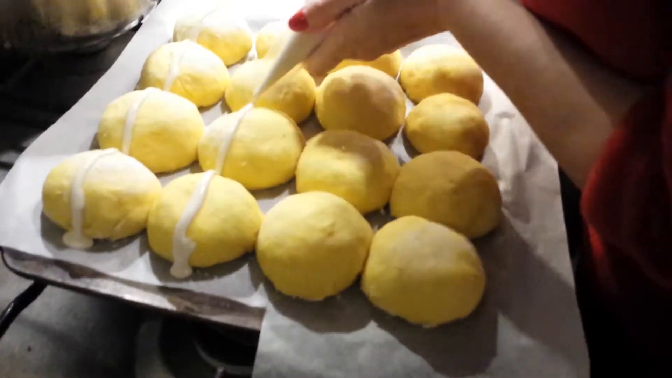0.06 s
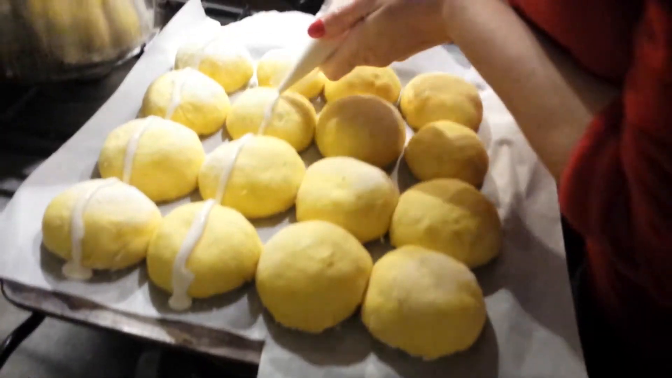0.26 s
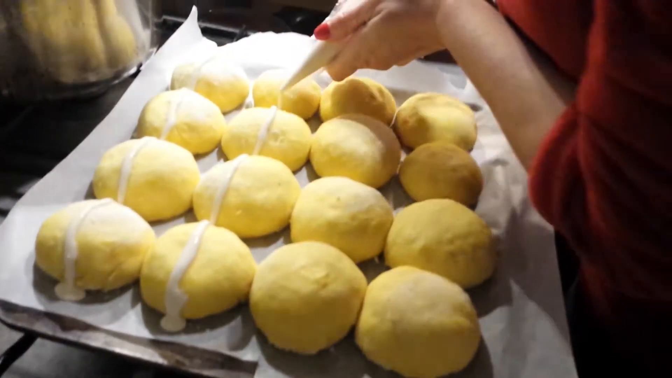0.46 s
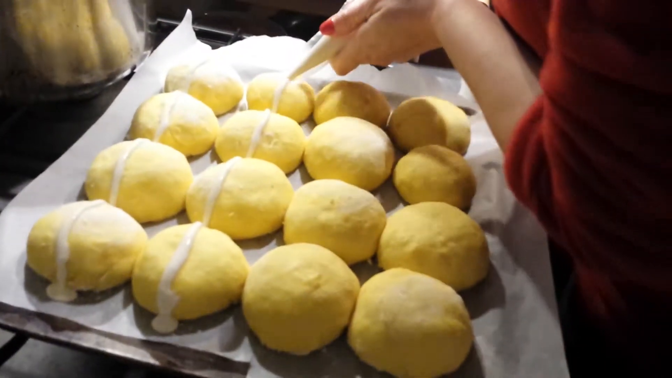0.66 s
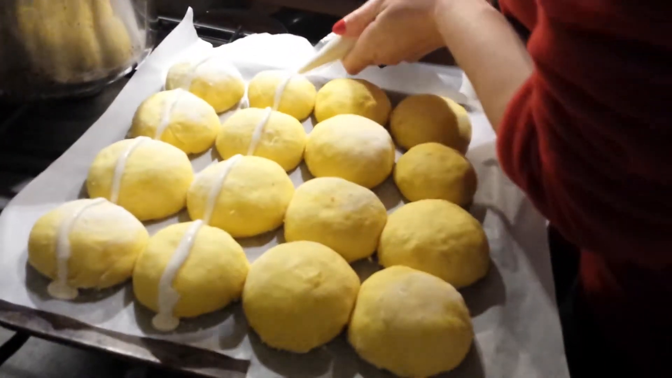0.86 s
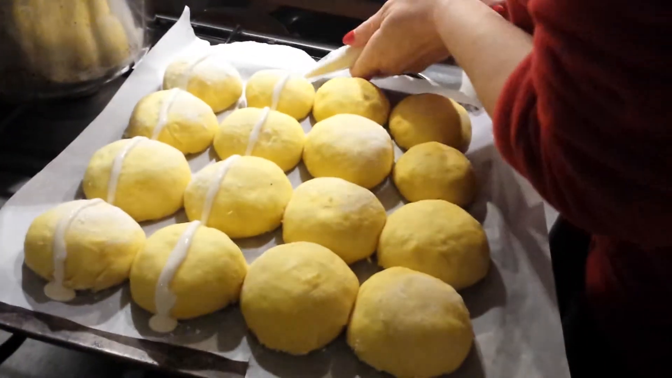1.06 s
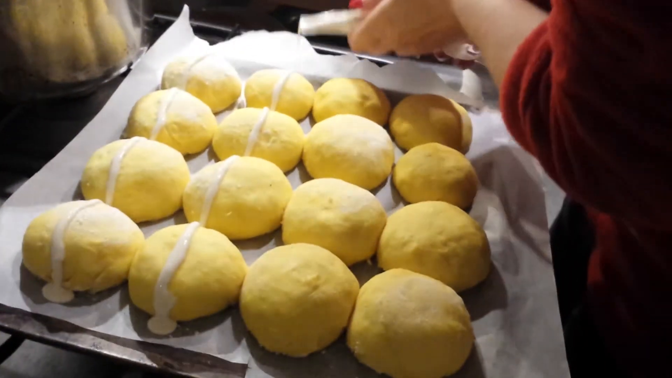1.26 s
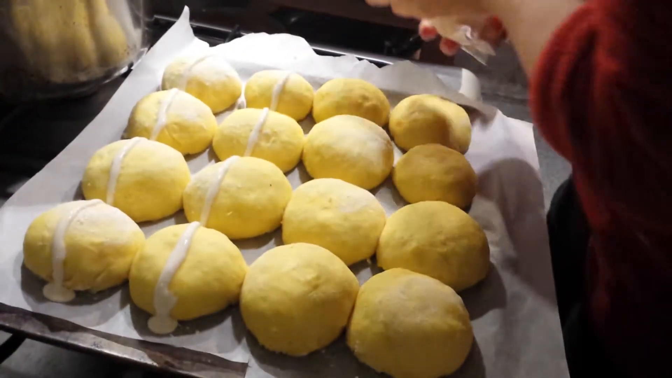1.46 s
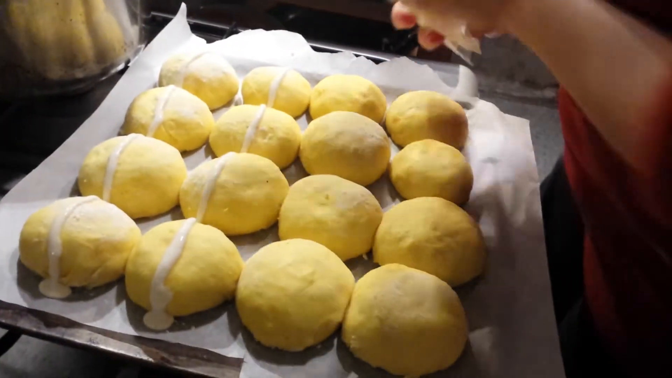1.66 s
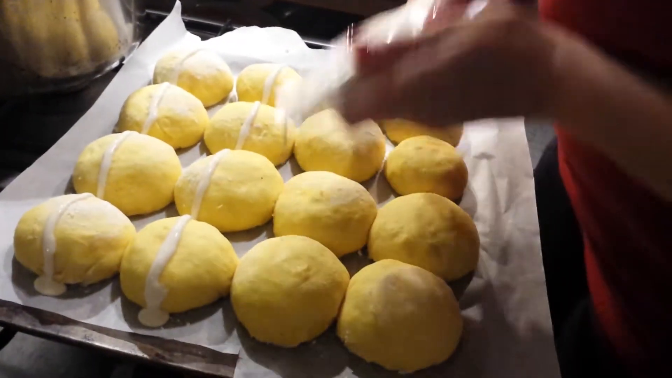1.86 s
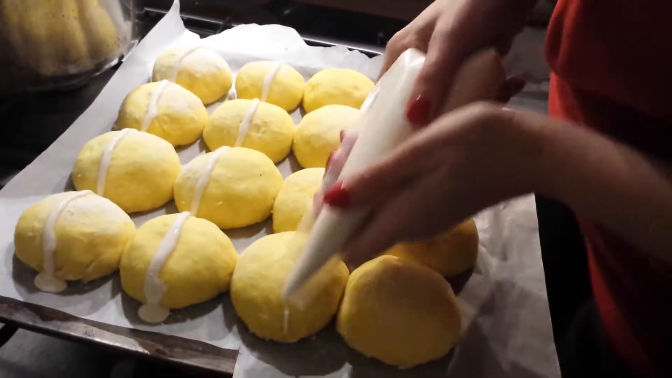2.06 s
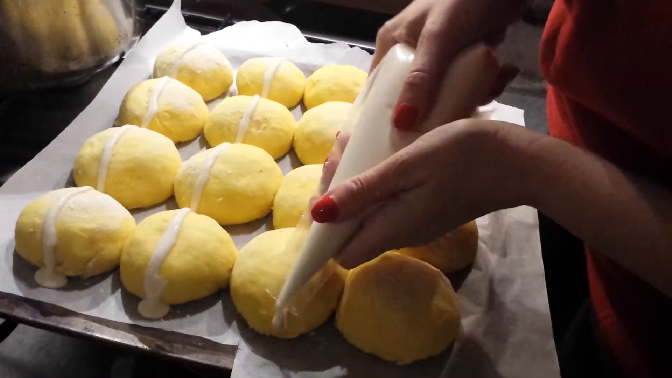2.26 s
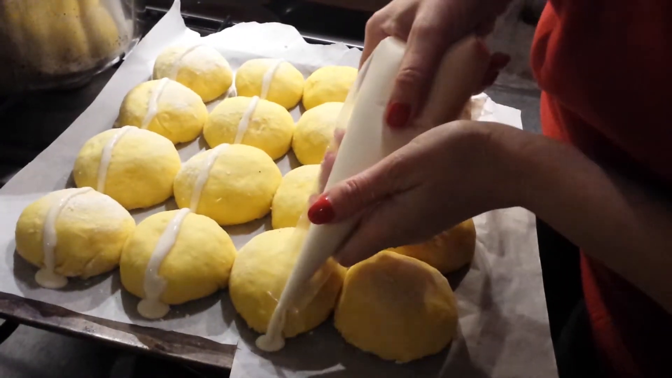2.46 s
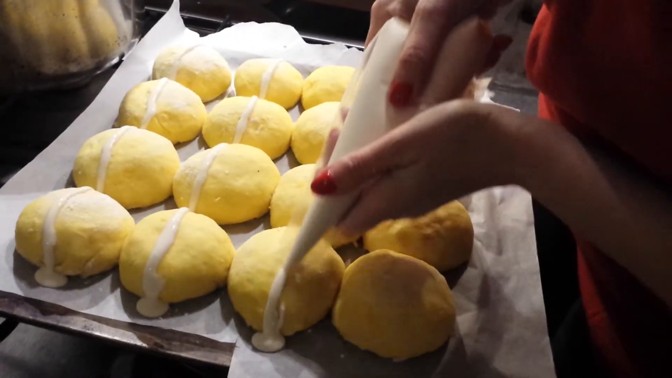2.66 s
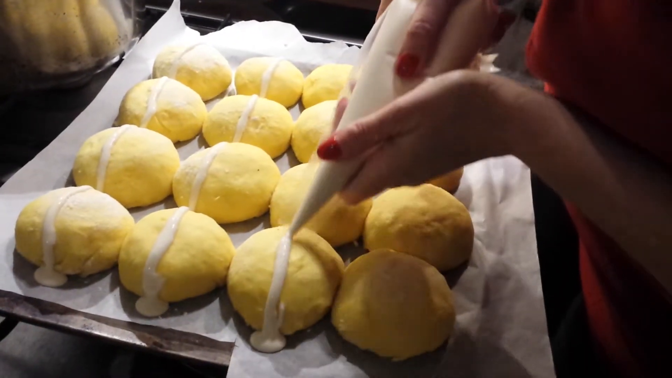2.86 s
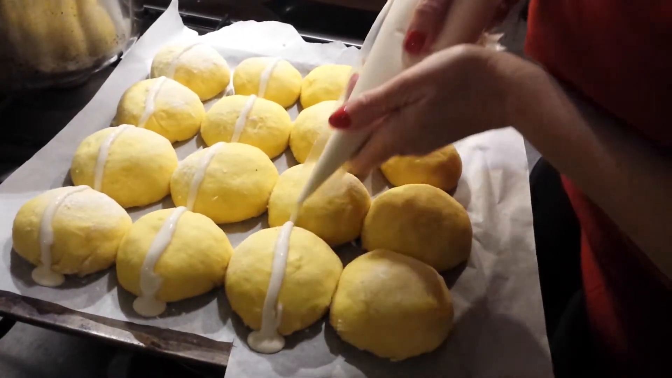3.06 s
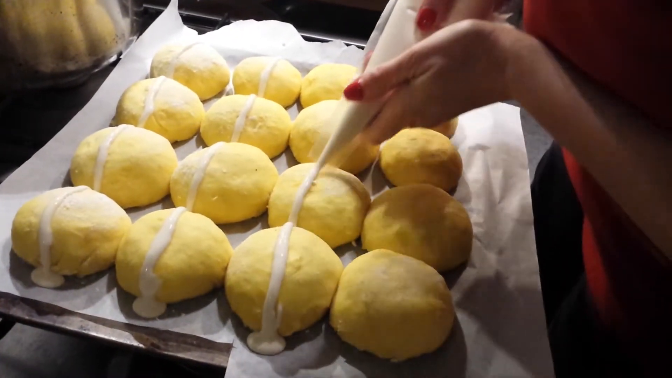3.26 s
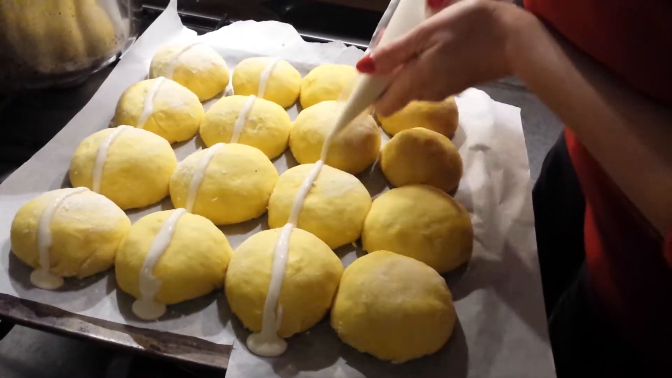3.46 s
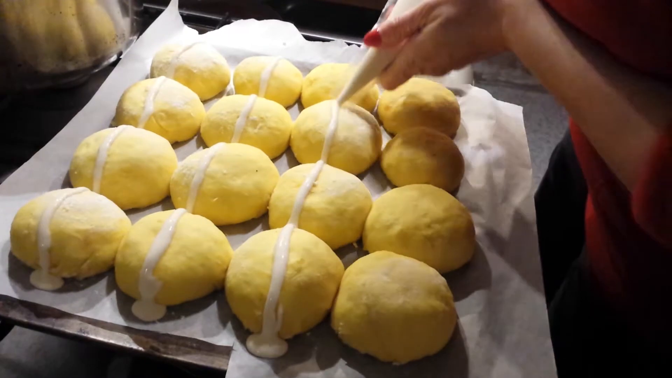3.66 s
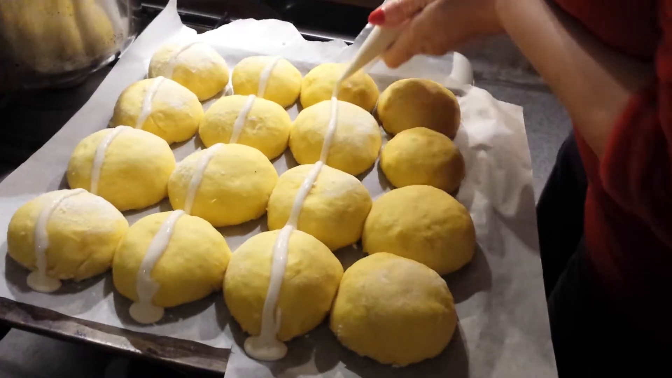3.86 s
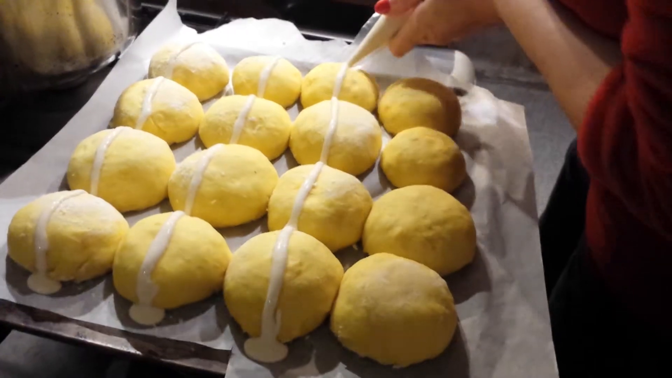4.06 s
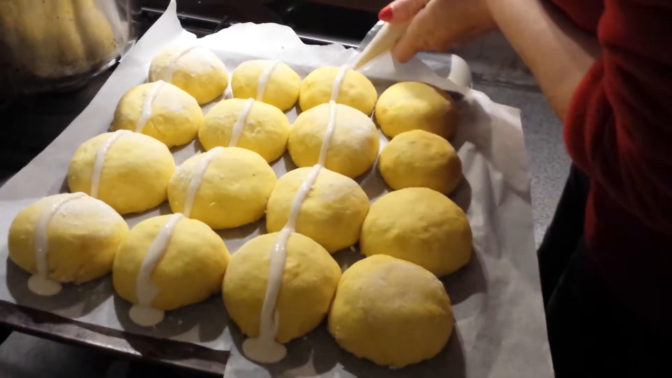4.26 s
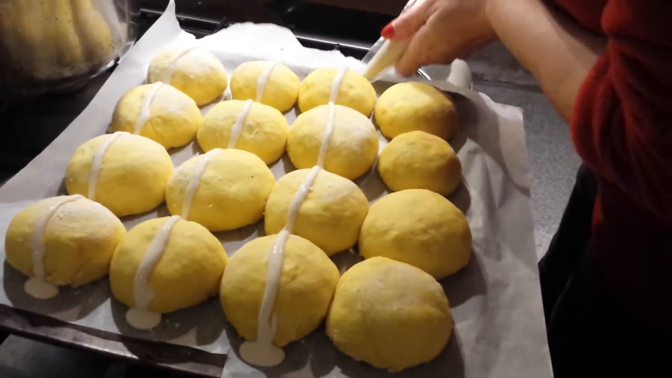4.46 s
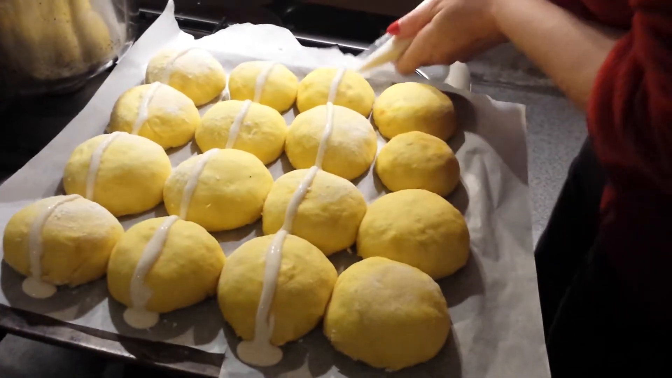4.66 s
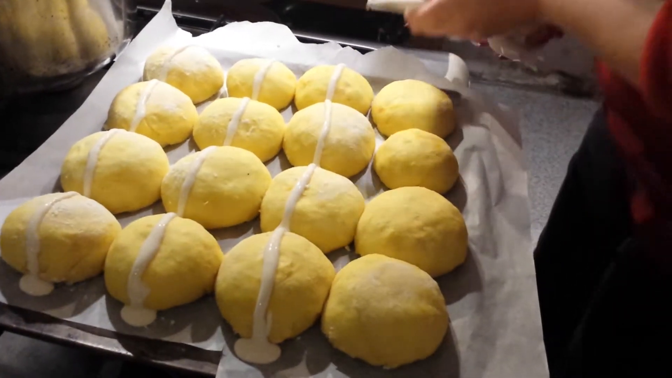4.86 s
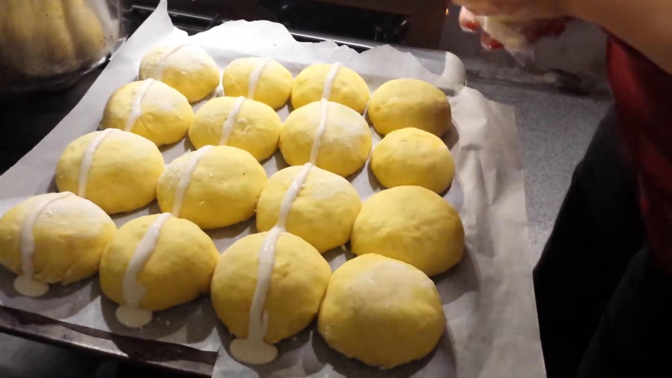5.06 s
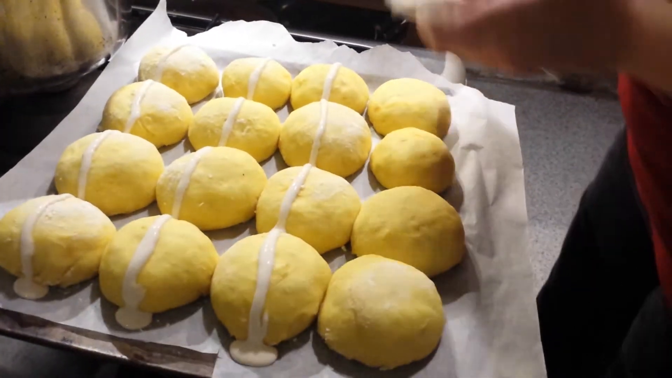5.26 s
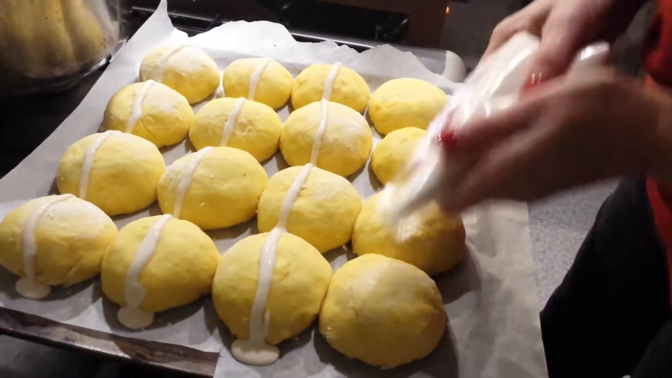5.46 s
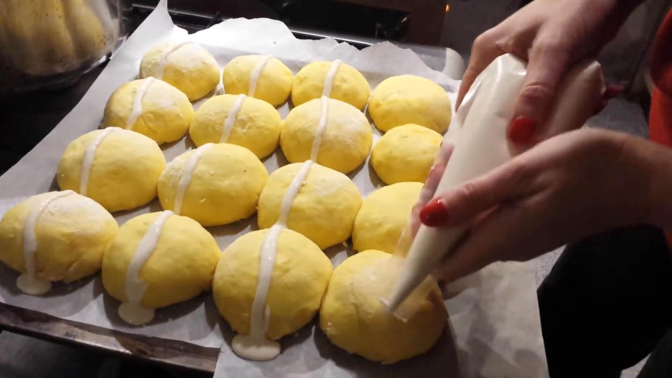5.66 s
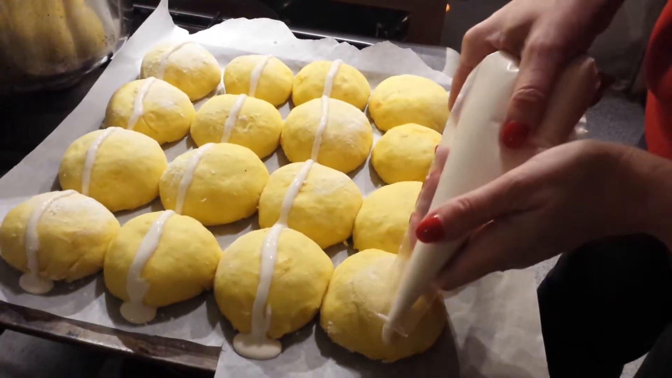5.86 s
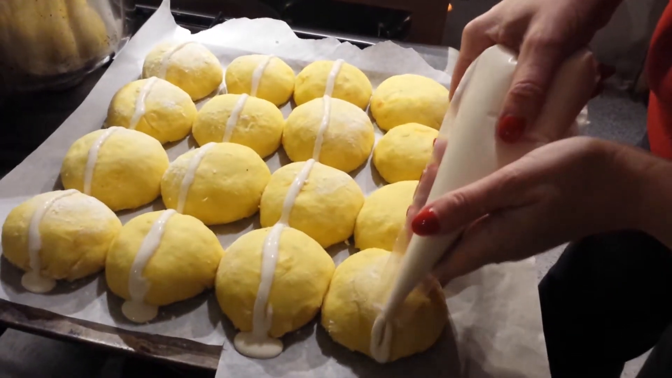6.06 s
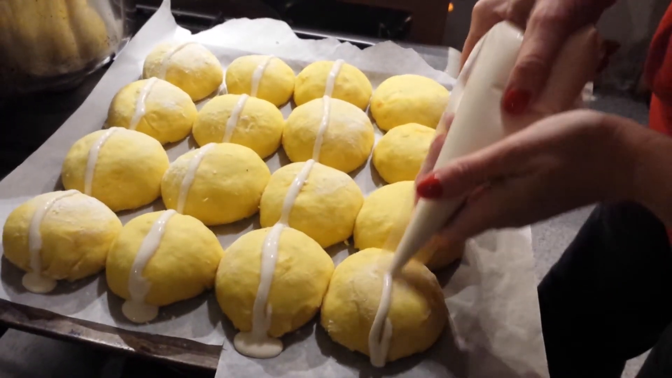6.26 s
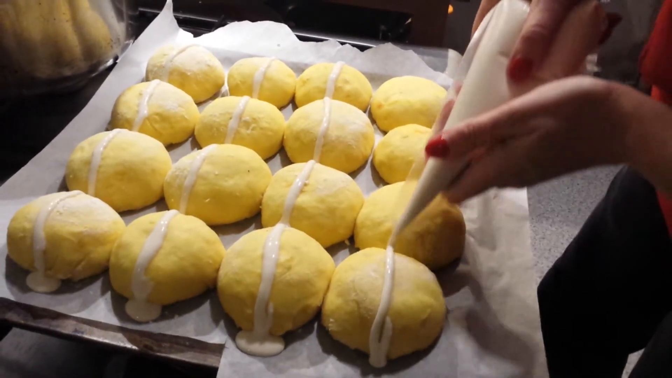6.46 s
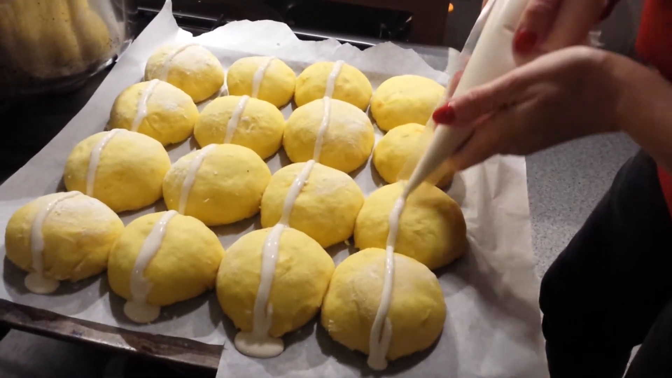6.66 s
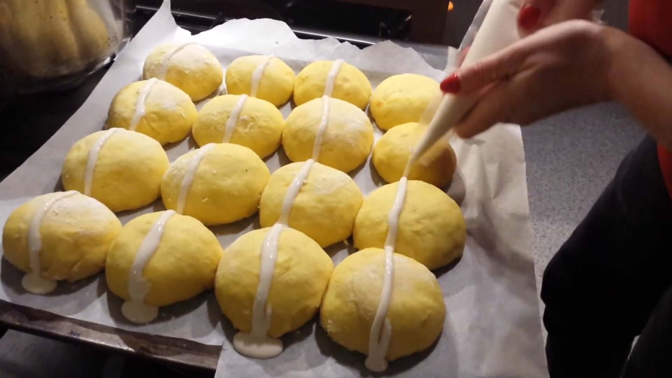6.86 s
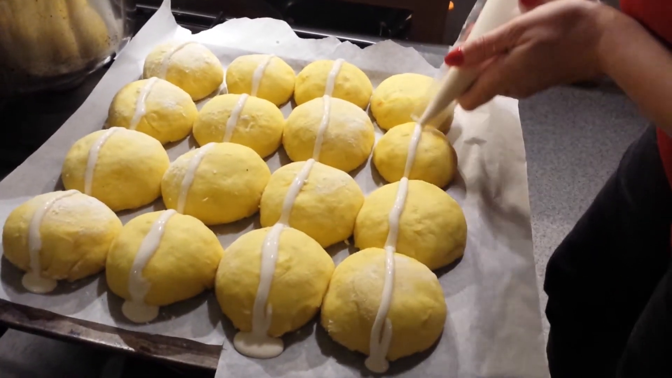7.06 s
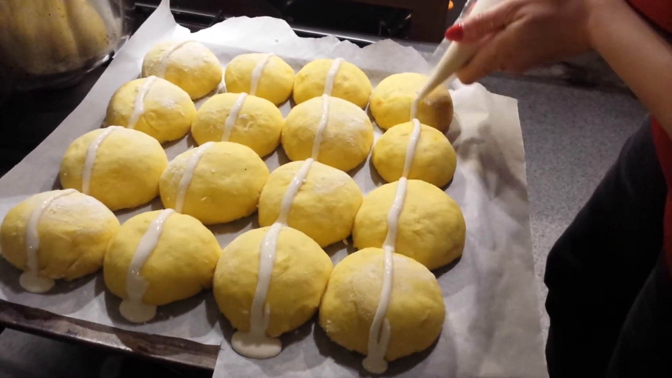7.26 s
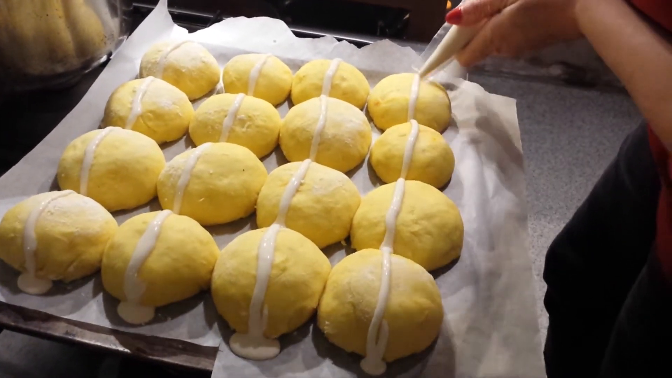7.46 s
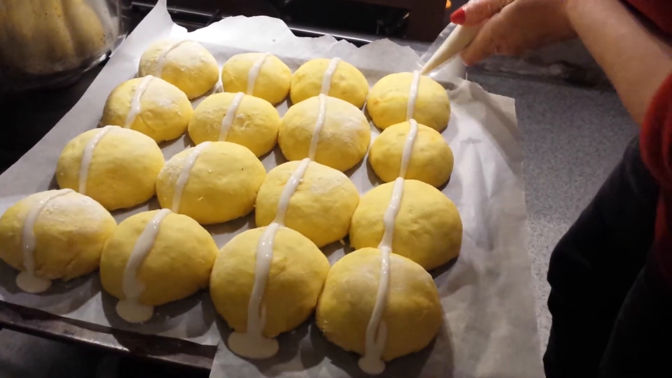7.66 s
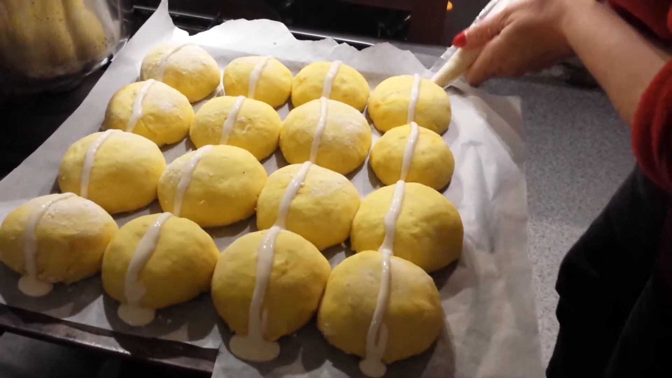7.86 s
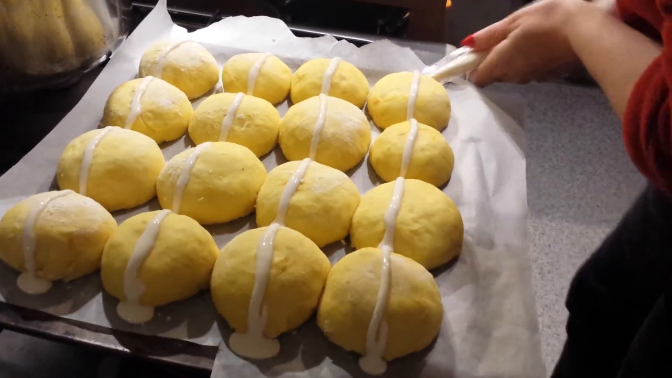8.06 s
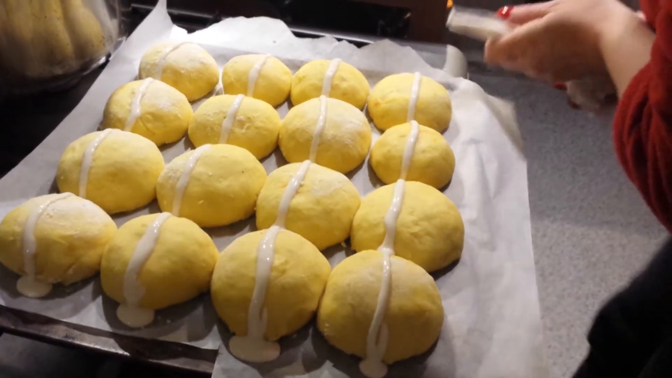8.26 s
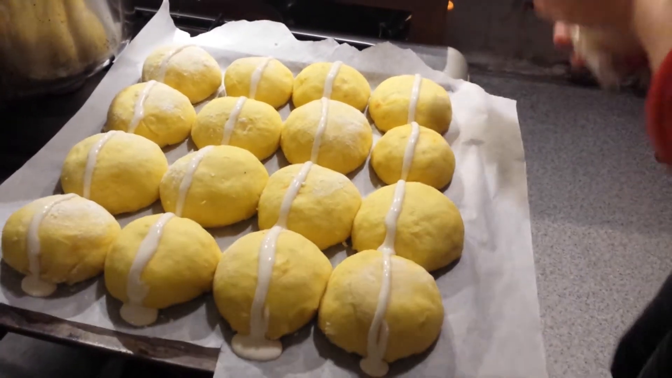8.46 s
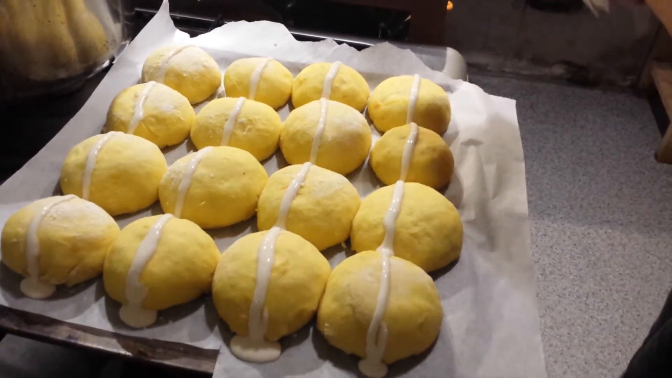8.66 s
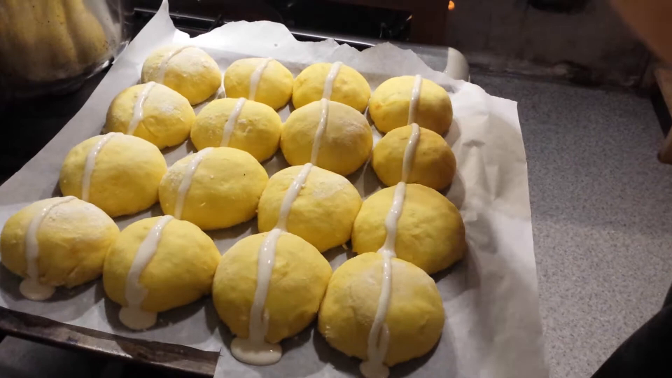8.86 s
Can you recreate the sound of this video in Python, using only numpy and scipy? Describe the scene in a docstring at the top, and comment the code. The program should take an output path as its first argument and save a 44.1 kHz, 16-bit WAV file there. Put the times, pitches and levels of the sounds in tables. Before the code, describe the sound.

Close to the microphone, a plastic piping bag rustles and snaps briefly, then icing squelches and spits faintly from the tip and the baking tray is softly bumped. A longer spell of crackling follows, with finger swishes and low thuds. After more quiet piping, a last sharp crinkle peaks with a soft thump. Underneath lies the faint hiss and electrical hum of a small, still kitchen.

```python
"""A plastic piping bag is squeezed over a tray of buns in a quiet kitchen, over a faint mains hum.
Icing squelches softly through the tip, and at 1 s the hands regrip: film slides, slack facets pop and
creases snap in small avalanches. Icing spits, low bumps shake the tray, and near 4.5 s comes a longer
regrip with dull thuds and finger swishes. More icing follows and a faint hollow noise swells; just after
8 s the last regrip peaks with a thud and a bump of the tray. The room rings briefly throughout."""
import sys
import numpy as np
from scipy import signal
from scipy.fft import rfft, irfft, next_fast_len
from scipy.io import wavfile
from scipy.ndimage import uniform_filter1d

SR = 44100
rng = np.random.default_rng(int(sys.argv[2]) if len(sys.argv) > 2 else 0)


def master_out(mix):
    """Clip the mix to full scale and print it as 16-bit PCM to the path in sys.argv[1]."""
    frames = np.transpose(np.atleast_2d(mix))
    ceiling = np.clip(frames, -1, 1)
    pcm = np.round(ceiling * 32767).astype(np.int16)
    wavfile.write(sys.argv[1], SR, pcm)


N = 392490
TIME = np.arange(N) / SR
FREQ = np.maximum(np.arange(N // 2 + 1) * SR / N, 1)

# Room tone of the still kitchen. Each row: frequency in Hz, level in dB.
AIR_SPECTRUM = [(15, -40), (25, -10), (66, -17.5), (96, 2.5), (126, -25.5), (198, -5.5), (274, -17),
                (305, -6), (368, -15.5), (399, -15), (848, -18.5), (1800, -19), (2060, -11), (2230, -18),
                (15500, -26)]
# Mains hum. Each row: frequency in Hz, level in dB.
HUM_PARTIALS = [(49.5, -82), (99, -82.5), (149, -81.5), (198, -95), (246, -92), (397, -88.5), (595, -90),
                (645, -87)]
# Fader curve of the late, hollow swell. Each row: time in seconds, level in dB.
SWELL_LEVELS = [(6.7, -100), (6.95, -77.5), (7.5, -75), (7.75, -86.5), (8.0, -60), (8.6, -75)]
# Resonances of that swell. Each row: centre in Hz, width in Hz, gain in dB.
SWELL_RESONANCES = [(296, 44, -5.5), (425, 110, -15)]
# Standing waves of the kitchen. Each row: frequency in Hz, seconds to fade by 60 dB, gain in dB.
ROOM_MODES = [(227, 0.11, 3), (330, 0.79, 5), (487, 0.15, 2), (710, 1, -18)]
# The heavy bag shifting its weight. Each row: start in seconds, level in dB, decay in seconds.
BAG_THUDS = [(4.79, -64, .12), (5.118, -63, 0.16), (8.232, -53, 0.073)]
# Tone of those thuds. Each row: frequency in Hz, gain in dB.
THUD_SPECTRUM = [(25, -19), (52, -5), (92, -1), (130, -11), (230, -11), (350, -6), (480, -9), (750, -30),
                 (2000, -58), (16000, -120)]
# Soft pushes against the tray. Each row: start in seconds, level in dB, length in seconds.
TRAY_PUSHES = [(3.2, -59.5, .05), (3.248, -62.5, .018), (3.288, -56.5, .016), (3.33, -70.5, .08),
               (5.116, -71, .03), (8.232, -54, .03)]
# Modes of the loaded tray. Each row: centre in Hz, width in Hz, gain in dB.
TRAY_MODES = [(226, 58, 0), (440, 60, -6), (672, 40, -18), (1300, 300, -9)]
# Icing forced through the tip. Each row: start in seconds, length in seconds, level in dB,
# resonance in Hz, relative hiss in dB.
ICING_SQUELCHES = [(0.323, 0.043, -71, 1640, -11), (0.67, 0.25, -74, 1990, -2),
                   (2.747, 0.14, -67.5, 2010, 0.5), (2.853, 0.096, -68, 2000, -5),
                   (3.512, 0.015, -66.5, 2100, -39), (3.59, 0.21, -68, 2180, 0.5),
                   (6.225, 0.21, -68, 2030, 2), (6.901, 0.036, -66.5, 1790, -9),
                   (7.115, 0.039, -65, 2220, 0.5)]
# Air bubbles bursting in bag and tip. Each row: start in seconds, level in dB, cavity pitch in Hz,
# ring in ms, relative wet smack in dB, relative click in dB.
AIR_BUBBLES = [(2.348, -59, 880, 2.4, -3, -16), (2.875, -55.5, 1450, 0.56, 14, -11),
               (2.981, -44, 950, 4.3, -1.5, -1.5), (3.5978, -48, 1870, 0.92, 3, -8.5),
               (5.366, -46, 2600, 1.2, -5, -5), (7.406, -55.5, 1390, 1.8, 3, -1)]
# Fingers sliding on taut film. Each row: start, rise and hold in seconds, level in dB,
# lower resonance and its width in Hz, relative upper resonance in dB.
FINGER_SWISHES = [(5.118, 0.0021, 0.037, -51, 2400, 1740, 2), (5.67, 0.018, .055, -61.5, 2540, 910, -1.5),
                  (8.59, .012, 0.089, -55, 2300, 800, -8.5)]
# Hand moves that slide film and sleeve. Each row: time of full speed, build-up and hold in seconds,
# level in dB, tilt in dB per octave, left minus right in dB.
HAND_MOVES = [(0.01, .02, .11, -68.5, -3.5, 3), (0.331, .015, .04, -68.5, -4.5, 0.5),
              (0.69, .015, .04, -71, -2, -1.5), (1.045, .06, .24, -55.5, -2.5, 1),
              (1.743, 0.037, .06, -71.5, -2, 4), (2.801, 0.027, .2, -74, -4.5, 4),
              (3.207, .006, .05, -62, -6.5, 2), (3.71, .06, .035, -65.5, -2.5, 1),
              (4.056, .02, .05, -67.5, -1.5, 1), (4.336, .13, 0.076, -65, -2.5, 0),
              (4.568, .06, .09, -48, -3, 0), (4.81, .05, .07, -54, -2.5, 1),
              (4.932, .02, .04, -61.5, -3, 6), (5.079, .06, .02, -65, -4.5, 8.5),
              (5.114, .002, 0.02, -63, -2, 6.5), (5.228, .04, .05, -62.5, -3.5, 4.5),
              (5.689, .015, .04, -63.5, -2, 3.5), (6.243, 0.031, .12, -70.5, 1, 0),
              (7.122, .03, .02, -72, -7, 7), (7.52, .1, 0.051, -68, -2, 1),
              (7.852, .004, 0.049, -50.5, 2.3, 0.5), (7.955, .02, .16, -53, -1, 1.5),
              (8.173, 0.04, 0.035, -45.5, -2, 0), (8.268, 0.04, .04, -43, -3, 1),
              (8.619, .012, .09, -55, -2.5, 3), (8.735, 0.017, .06, -55.5, -2.5, 4)]
# Tone of the plastic film. Each row: frequency in Hz, gain in dB.
FILM_SPECTRUM = [(30, -36), (60, -10), (130, -12.5), (300, -10), (580, -11), (910, -9), (1330, -9),
                 (1920, -1.5), (2710, -4), (3790, -3), (5320, -1.5), (7320, -3.5), (9890, -6), (13350, -10),
                 (16000, -14.5)]
# Creases snapping. Each row: start in seconds, level in dB, decay in ms, tilt in dB per octave,
# facet resonance in Hz.
CREASE_SNAPS = [(0.037, -53, 1.1, -11.5, 1490), (0.060, -43.5, 1.8, -8.5, 5450),
                (1.056, -43, 0.85, -32, 1360), (1.0615, -27.5, 6.8, -2.5, 1430),
                (1.0622, -19.5, 2.8, -1.5, 4700), (1.0865, -25, 6.4, -1.5, 1280),
                (1.100, -31.5, 4, -4, 4900), (1.117, -37.5, 3.6, -10, 1530), (1.2112, -32, 3.6, -3.5, 1510),
                (1.2295, -31, 11, -3.5, 700), (1.247, -36.5, 4.6, -6.5, 1050), (1.289, -42, 10, -16, 950),
                (1.319, -52, 2, 7, 5800), (1.510, -50.5, 4, -5.5, 1140), (2.427, -51, 3.2, 2, 1360),
                (4.328, -46, 2, -8, 5550), (4.428, -36.5, 7.2, -4, 6500), (4.449, -29.5, 12, -4.5, 1680),
                (4.4585, -19, 3.2, -2.5, 6550), (4.4755, -29.5, 1.5, -6, 4880),
                (4.5332, -19.5, 3.7, -1, 1990), (4.5422, -15, 2.8, 3, 4260), (4.5495, -20.5, 1.3, -1, 4480),
                (4.563, -31, 2.2, -4, 4500), (4.578, -26, 4.6, 1, 2074), (4.596, -22.5, 2.1, 0.5, 3700),
                (4.6128, -23, 2.7, 1, 1810), (4.6162, -14, 3.3, -2, 920), (4.6790, -28, 1.8, -2.5, 1930),
                (4.689, -31, 10, -3.5, 1390), (4.7052, -22, 3.2, -3.5, 1470), (4.7344, -25, 3.4, -4.5, 830),
                (4.7516, -21.5, 4.4, 1.5, 4100), (4.763, -32, 1.4, -7, 840), (4.7800, -25.5, 3.9, -1, 905),
                (4.786, -29.5, 3.4, -12, 1490), (4.7908, -16.5, 3, 0.5, 1720),
                (4.816, -29.5, 6.9, -14.5, 890), (4.844, -24.5, 5.4, -1.5, 1290),
                (4.854, -25.5, 4.3, -6, 5800), (4.891, -47, 1, -1, 5500), (5.030, -45, 3.9, 1, 2370),
                (5.078, -45.5, 1.7, 3, 2630), (5.241, -32.5, 0.8, -7, 5370), (5.258, -40.5, 1.6, 7, 760),
                (6.122, -47.5, 1, -3, 2240), (6.377, -44.5, 3.7, -1.5, 1980), (7.855, -40, 4.7, -1.5, 1170),
                (7.9115, -28, 1, -3, 3300), (7.953, -37, 7, -5, 1460), (8.001, -38.5, 1.7, -5, 1680),
                (8.021, -37.5, 5.3, -7, 2760), (8.040, -39, 4.8, -7, 1080), (8.107, -34, 1.6, 1, 1039),
                (8.1328, -31.5, 2.6, -2, 1950), (8.140, -26.5, 2.1, -1, 1100), (8.152, -28, 1.8, 2, 2000),
                (8.1595, -23, 1.7, -3, 1610), (8.1632, -26, 3.4, 1, 1620), (8.1855, -30, 4.5, -4.5, 1400),
                (8.1955, -37, 1.7, 3, 6000), (8.2283, -26, 2.8, -2, 1000), (8.2312, -11, 6.5, -0.9, 1300),
                (8.2548, -15, 9, -3.5, 6500), (8.2631, -16.5, 2.9, -1, 1000), (8.2835, -30, 1.6, -2, 1000),
                (8.291, -22.5, 3.3, 2, 6340), (8.297, -32.5, 3, -1, 5500), (8.340, -35, 5, 0, 2330),
                (8.683, -35.5, 9.9, -4.5, 4900), (8.745, -44, 2.8, -11, 1500), (8.763, -42, 1.6, -13, 2030),
                (8.800, -51, 1.3, -10, 2610), (8.833, -58, 1, -2, 6600)]
# How alike left and right sound. Each row: frequency in Hz, correlation from 0 to 1.
STEREO_LIKENESS = [(100, .82), (400, .91), (800, .83), (1500, .55), (3000, .25), (5000, .02), (15000, 0)]
# Stereo lean of the sounds from the hands. Each row: frequency in Hz, left minus right in dB.
HAND_BALANCE = [(300, .5), (1000, -.8), (2200, 2), (5000, 1.8), (8000, -3.5), (13000, -10)]
# Tone of the microphone ports. Each row: centre in Hz, width in Hz, gain in dB.
MIC_PORTS = [(2000, 420, -3), (3570, 2120, -3.5), (5670, 1260, 2.5)]


def undb(db):
    """Decibels to gain."""
    return 10 ** (np.asarray(db) / 20)


def unit(x):
    """Scale to rms 1."""
    return x / np.sqrt(np.mean(np.abs(x) ** 2) + 1e-30)


def along(table, freq):
    """Read (Hz, value) points on a log-frequency axis."""
    points, values = np.transpose(table)
    return np.interp(np.log(freq), np.log(points), values)


def colour(x, gain):
    """Filter by a gain for each frequency."""
    return irfft(rfft(x) * gain, N)


def passband(x, hz, width):
    """Keep one band, at rms 1."""
    edges = np.clip([hz - width / 2, hz + width / 2], 50, .45 * SR)
    return unit(signal.sosfilt(signal.butter(2, edges, "band", fs=SR, output="sos"), x))


def resonance(hz, width):
    """Response of one mode, gain 1 at its centre."""
    return 1 / (1 + 1j * (FREQ - hz ** 2 / FREQ) / width)


def causal(gain):
    """Minimum-phase response of a gain curve: it rings only after the hit."""
    cepstrum = irfft(np.log(gain))
    half = len(cepstrum) // 2
    cepstrum[1:half] *= 2
    cepstrum[half + 1:] = 0
    return np.exp(rfft(cepstrum))


def drift(rate_hz, hop=32):
    """Smooth random wander with a spread of 1."""
    steps = next_fast_len(N // hop + 2, True)
    freq = np.arange(steps // 2 + 1) * SR / (hop * steps)
    coarse = unit(irfft(rfft(rng.standard_normal(steps)) / (1 + (freq / rate_hz) ** 4), steps))
    return np.interp(np.arange(N) / hop, np.arange(steps), coarse)


def press(start, length):
    """Envelope of a push that comes quickly, holds and lets go."""
    return np.sqrt(np.abs(np.sin(np.pi * np.clip((TIME - start) / length, 0, 1))))


def pan(left_minus_right_db):
    """Left and right gains for a level difference."""
    return undb(left_minus_right_db * np.array([[.5], [-.5]]))


def mic_pair(x):
    """Mid and side to left and right: two close microphones share the bass and keep their own treble."""
    alike = np.clip(along(STEREO_LIKENESS, FREQ), 0, .99)
    mid = colour(x[0], np.sqrt((1 + alike) / 2))
    side = colour(x[1], np.sqrt((1 - alike) / 2))
    return np.array([mid + side, mid - side])


def room_tone(air_db=-68.5, sway_db=1.7, sway_below_hz=450):
    """Still kitchen air: a steady hiss over a rumble that sways a little."""
    air = mic_pair(unit(colour(rng.standard_normal((2, N)), undb(along(AIR_SPECTRUM, FREQ)))))
    rumble = colour(air, 1 / (1 + (FREQ / sway_below_hz) ** 4))
    return (air - rumble + rumble * undb(sway_db * drift(5.7))) * undb(air_db)


def mains_hum(waver_db=1.5):
    """A faint mains hum whose partials each waver in level and phase."""
    hum = 0
    for hz, db in HUM_PARTIALS:
        amplitude = np.sqrt(2) * undb(db + waver_db * drift(1.9))
        hum = hum + amplitude * np.sin(2 * np.pi * hz * TIME + 0.3 * drift(8.1))
    return hum


def hollow_swell(waver_db=3.5, top_hz=900):
    """Dull, hollow noise swells and wavers under the late rustling."""
    body = sum(undb(db) * resonance(hz, width) for hz, width, db in SWELL_RESONANCES)
    noise = unit(colour(rng.standard_normal(N), body / (1 + (FREQ / top_hz) ** 4)))
    return noise * undb(np.interp(TIME, *np.transpose(SWELL_LEVELS)) + waver_db * drift(16.0))


def kitchen_reverb(x, tail_db=-7.0, low_t60_s=0.22, treble_t60_s=0.13, split_hz=5000, build_s=0.001):
    """A short room tail whose treble dies first."""
    t = TIME[:SR // 2]
    noise = rng.standard_normal((2, len(t)))
    low = signal.sosfilt(signal.butter(2, split_hz, fs=SR, output="sos"), noise)
    high = signal.sosfilt(signal.butter(2, split_hz, "high", fs=SR, output="sos"), noise)
    tail = low * undb(-60 * t / low_t60_s) - high * undb(-60 * t / treble_t60_s)
    tail = undb(tail_db) * unit(tail * (1 - np.exp(-t / build_s))) / np.sqrt(len(t))
    return signal.fftconvolve(x, tail, axes=1)[:, :N]


def standing_waves(x):
    """A few low room modes linger after the bag has moved."""
    modes = sum(undb(db) * resonance(hz, np.log(1000) / (np.pi * t60)) for hz, t60, db in ROOM_MODES)
    return colour(x, modes)


def arm_rumble(level_db, rumble_db=-64.5, at_db=-55, follow=0.72, smooth_s=0.26, hz=92, width_hz=55):
    """Arms and body shift with each regrip: a soft low rumble that follows the hands slowly."""
    effort_db = uniform_filter1d(level_db, size=int(smooth_s * SR))
    low = resonance(hz, width_hz) / (1 + (FREQ / (3 * hz)) ** 4)
    rumble = mic_pair(unit(colour(rng.standard_normal((2, N)), low)))
    return rumble * undb(rumble_db + follow * (effort_db - at_db))


def bag_thuds(rise_s=0.0044):
    """The mass of icing lurches in the hands: a deep, pitchless thud, dead centre."""
    envelope = 0
    for start, db, decay in BAG_THUDS:
        t = TIME - start
        envelope = envelope + undb(db) * np.clip(t / rise_s, 0, 1) * np.exp(-np.abs(t) / decay)
    return unit(colour(rng.standard_normal(N), undb(along(THUD_SPECTRUM, FREQ)))) * envelope


def tray_bumps(slip_hz=113, uneven=.05, scuff_db=-10, contact_hz=560):
    """Soft, shuddering pushes ring the low modes of the tray, damped by the dough."""
    push = sum(undb(db) * press(start, length) for start, db, length in TRAY_PUSHES)
    cycles = np.cumsum(slip_hz * (1 + uneven * drift(60))) / SR
    slips = unit(np.diff(np.floor(cycles), prepend=0) * undb(drift(100)))  # one tick a cycle
    force = np.outer([1, 0], slips) + undb(scuff_db) * rng.standard_normal((2, N))
    body = sum(undb(db) * resonance(hz, width) for hz, width, db in TRAY_MODES)
    soft_contact = 1 / np.sqrt(1 + (FREQ / contact_hz) ** 6) + .08
    return colour(force * push, unit(body * soft_contact))


def squelches(width_hz=620, hiss_hz=7000, hiss_width_hz=7000, sticky_db=3):
    """Sticky icing crackles finely as it is forced through the narrow tip."""
    crackle = rng.standard_normal((2, N)) * undb(sticky_db * drift(560))
    hiss = unit(colour(crackle, resonance(hiss_hz, hiss_width_hz)))
    out = 0
    for start, length, db, hz, hiss_db in ICING_SQUELCHES:
        squelch = passband(crackle, hz, width_hz) + undb(hiss_db) * hiss
        out = out + squelch * undb(db) * press(start, length)
    return out


def bubbles(smack_hz=1950, smack_width_hz=750, click_hz=5500, click_width_hz=2600, burst_ms=1.9):
    """A trapped bubble bursts with a smack and a click, and its hollow rings for a moment."""
    size = 2048
    out = np.zeros((2, N + size))
    ms = 1000 * TIME[:size]
    for start, db, hz, ring_ms, smack_db, click_db in AIR_BUBBLES:
        hollow = unit(np.sin(2 * np.pi * hz * TIME[:size]) * np.exp(-ms / ring_ms))
        burst = rng.standard_normal((2, size)) * np.exp(-ms / burst_ms)
        smack = undb(smack_db) * passband(burst, smack_hz, smack_width_hz)
        click = undb(click_db) * passband(burst, click_hz, click_width_hz)
        at = int(start * SR)
        out[:, at:at + size] += (np.outer([1, 0], hollow) + smack + click) * undb(db) / np.sqrt(ms[-1])
    return out[:, :N]


def swishes(upper_hz=5700, upper_width_hz=1900, release_s=0.035, catch_db=3.5, flicker_db=0.9,
            sag_db=-3.5):
    """Skin catches and slips on taut film, which answers in two resonances that flicker separately."""
    slips = rng.standard_normal((2, N)) * undb(catch_db * drift(400))
    upper = unit(passband(slips, upper_hz, upper_width_hz) * undb(flicker_db * drift(30)))
    lower_slips = slips * undb(flicker_db * drift(30))
    out = 0
    for start, rise, hold, db, hz, width, upper_db in FINGER_SWISHES:
        t = TIME - start
        envelope = np.clip(t / rise, 0, 1) * np.exp(-np.clip(t - rise - hold, 0, 1) / release_s)
        envelope *= undb(db + sag_db * np.clip(t / hold, 0, 1))
        out = out + (passband(lower_slips, hz, width) + undb(upper_db) * upper) * envelope
    return out


def hand_motion(rest_db=-78, rest_tilt_db=-3, sag_db_per_s=9.5, release_s=.045,
                unfold_db=-22.5, unfold_s=0.22):
    """Level, tilt and pan curves of the sliding: moves build, sag and fade; the strongest sets the tone."""
    power = np.full(N, undb(rest_db) ** 2)  # the hands never quite rest
    tilt_sum, pan_sum = power * rest_tilt_db, 0
    for peak, build, hold, db, tilt_db, pan_db in HAND_MOVES:
        t = TIME - peak
        after = np.clip(t - hold, 0, 2)
        attack = np.exp(np.clip(t / build, -20, 0))
        unfolding = undb(unfold_db) * np.exp(-after / unfold_s)  # crumpled film goes on opening softly
        release = np.maximum(np.exp(-after / release_s), unfolding)
        move = (attack * release * undb(db - sag_db_per_s * np.clip(t, 0, hold))) ** 2
        power += move
        tilt_sum += move * tilt_db
        pan_sum += move * pan_db
    return 10 * np.log10(power), tilt_sum / power, pan_sum / power


def film_gain(freq, tilt_db):
    """The film's tone, brighter when it is taut."""
    octaves = np.log2(np.maximum(freq, 1100) / 3000)
    return undb(along(FILM_SPECTRUM, freq) + tilt_db * octaves)


def icing_damping(x, top_hz):
    """The icing inside damps the highest treble of the film."""
    return colour(x, 1 / np.sqrt(1 + (FREQ / top_hz) ** 4))


def rustle(level_db, tilt_db, grains_per_s=1100, grain_db=2.5, rub_db=-5, flicker_db=3.0):
    """Sliding film catches and slips: dense uneven grains over a smooth rub, flickering by octave."""
    sizes = undb(grain_db * np.minimum(rng.exponential(size=N), 5))
    slips = (rng.random(N) < grains_per_s / SR) * sizes
    grip = np.sqrt(np.abs(uniform_filter1d(slips ** 2, size=16)))
    grains = rng.standard_normal((2, N)) * (unit(grip) + undb(rub_db))
    spectrum = rfft(grains) * film_gain(FREQ, 0)
    out, power = 0, 0
    for octave in np.arange(-5, 4):
        window = np.cos(np.pi / 2 * np.clip(np.log2(FREQ / 3000) - octave, -1, 1)) ** 2
        band = irfft(spectrum * window, N)
        gain = undb(np.clip(tilt_db, -8, 4) * max(octave, -2))
        out = out + band * gain * undb(flicker_db * drift(28.0))
        power = power + np.mean(band ** 2) * gain ** 2
    return out / np.sqrt(power) * undb(level_db)


def small_pops(level_db, count=170, busy_db=-53, offset_db=-0.5, spread_db=5, decay_ms=2.6, tilt_db=-4,
               low_hz=950, high_hz=2800):
    """Extra crease rows: slack facets pop over at random, denser and harder the more the bag moves."""
    crumpled = np.cumsum(undb(np.minimum(level_db, busy_db)))
    when, force, pitch = rng.random((count, 3)).T
    at = np.searchsorted(crumpled, when * crumpled[-1])
    pop_db = level_db[at] + offset_db + spread_db * (2 * force - 1)
    facet_hz = low_hz * (high_hz / low_hz) ** pitch
    return [(start, db, decay_ms, tilt_db, hz) for start, db, hz in zip(TIME[at], pop_db, facet_hz)]


def creases(rows, rise_ms=0.19, ragged_db=4.0, echo_db=-16, echo_ms=11, thin_hz=1100,
            facet_octaves=0.36, max_ring_db=10, pitchless_db=-13, ring_loss_db_per_db=2.6):
    """Each crease gives way in a fading avalanche of tiny snaps that ring its own facet of film."""
    size = 4096
    out = np.zeros((2, N + size))
    ms = 1000 * TIME[:size]
    freq = np.maximum(np.arange(size // 2 + 1) * SR / size, 1)
    for start, db, decay_ms, tilt_db, facet_hz in rows:
        noise = rng.standard_normal((3, size))
        ragged = undb(ragged_db * unit(uniform_filter1d(noise[2], size=12)))
        fade = np.exp(-ms / decay_ms)
        avalanche = (1 - np.exp(-ms / rise_ms)) * fade
        # tray and worktop scatter it back; a longer avalanche feeds more echo
        echoes = undb(echo_db) * np.sqrt(decay_ms / 3) * (1 - fade) * np.exp(-ms / echo_ms)
        crackle = noise[:2] * ragged * np.hypot(avalanche, echoes)
        # a gentle snap rings one facet; a hard one buckles so many that no pitch is left
        ring_db = np.clip(ring_loss_db_per_db * (pitchless_db - db), 0, max_ring_db)
        facet = undb(ring_db * np.exp(-.5 * (np.log2(freq / facet_hz) / facet_octaves) ** 2))
        # a short avalanche moves only a small patch of film, which radiates little bass
        thin = freq / np.hypot(freq, thin_hz / decay_ms)
        snap = irfft(rfft(crackle) * causal(film_gain(freq, tilt_db) * facet * thin))
        at = int(start * SR)
        out[:, at:at + size] += unit(snap) * undb(db) / np.sqrt(ms[-1])
    return out[:, :N]


def scene(crease_db=-1.78, rustle_db=-2.0, tip_send_db=-3.5):
    """The mix: tray, icing and crackling bag over the quiet bed of the kitchen."""
    bed = (room_tone() + mains_hum() + hollow_swell()) * pan(left_minus_right_db=1)
    tray = tray_bumps()
    level_db, tilt_db, pan_db = hand_motion()
    sliding = icing_damping(rustle(level_db, tilt_db), top_hz=13000)
    snapping = icing_damping(creases(list(CREASE_SNAPS) + small_pops(level_db)), top_hz=14000)
    bag = undb(rustle_db) * sliding + swishes() + undb(crease_db) * snapping
    tip = squelches() + bubbles()
    # the tip is nearest to the microphones, so it sounds drier
    room = kitchen_reverb(bag + tray + undb(tip_send_db) * tip) + standing_waves(bag)
    hands = mic_pair(bag + tray + tip + room) * pan(pan_db)
    balance = pan(along(HAND_BALANCE, FREQ))
    balance /= np.sqrt(np.mean(balance ** 2, axis=0))
    return colour(hands, balance) + arm_rumble(level_db) + bag_thuds() + bed


def record(dry, low_cut_hz=36, top_hz=15800):
    """The microphone ports colour the sound; the deepest bass and the top are cut."""
    ports_db = sum(db / (1 + (2 * (FREQ - hz) / width) ** 2) for hz, width, db in MIC_PORTS)
    bass_cut = 1 / np.sqrt(1 + (low_cut_hz / FREQ) ** 6)
    top_cut = signal.ellip(10, .2, 70, top_hz, fs=SR, output="sos")
    return signal.sosfilt(top_cut, colour(dry, undb(ports_db) * bass_cut))


dry = scene()
out = record(dry)
master_out(out)
```